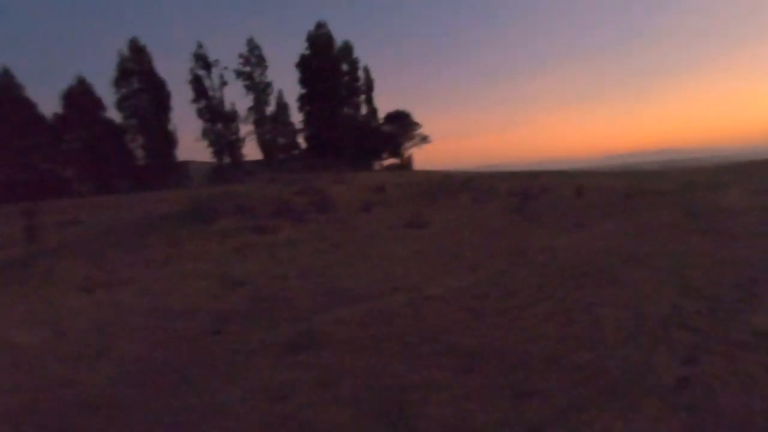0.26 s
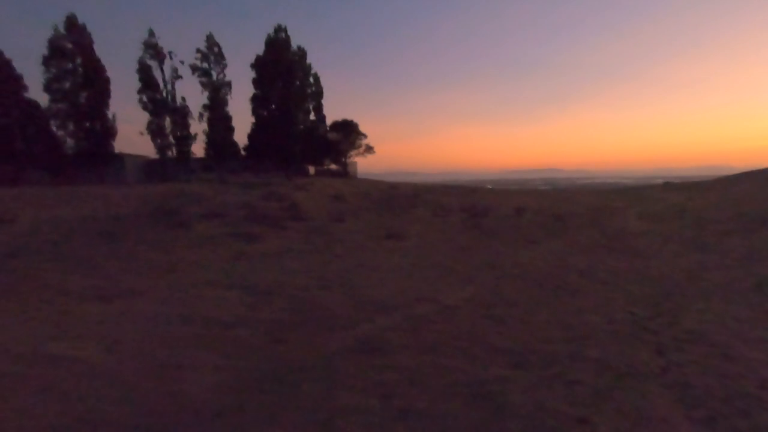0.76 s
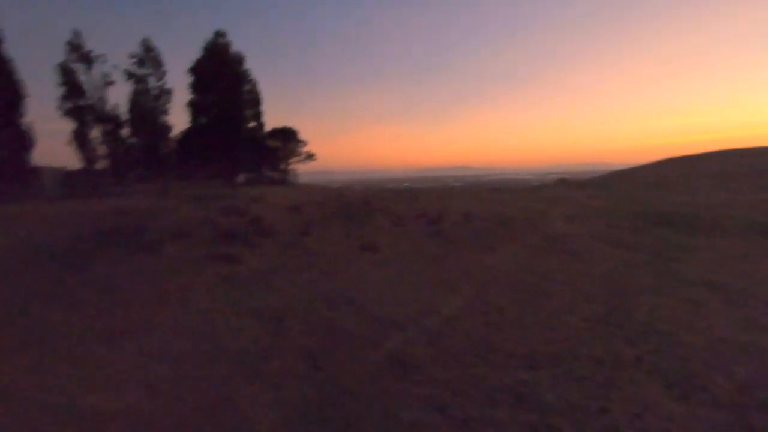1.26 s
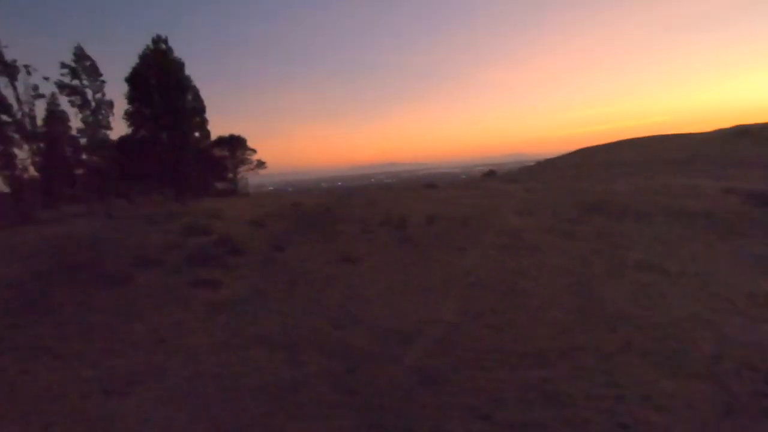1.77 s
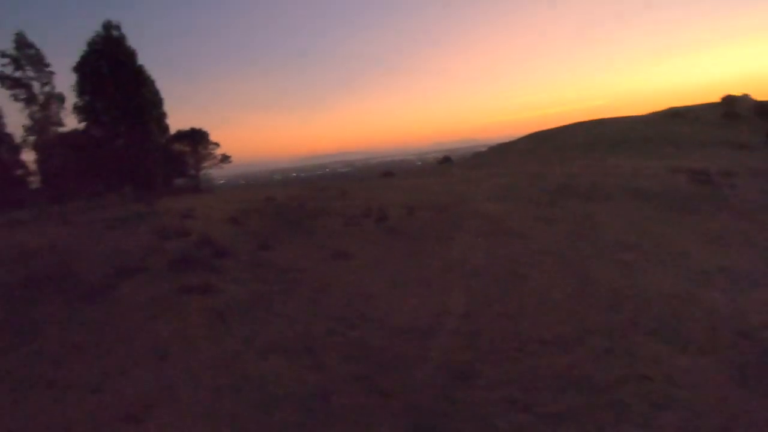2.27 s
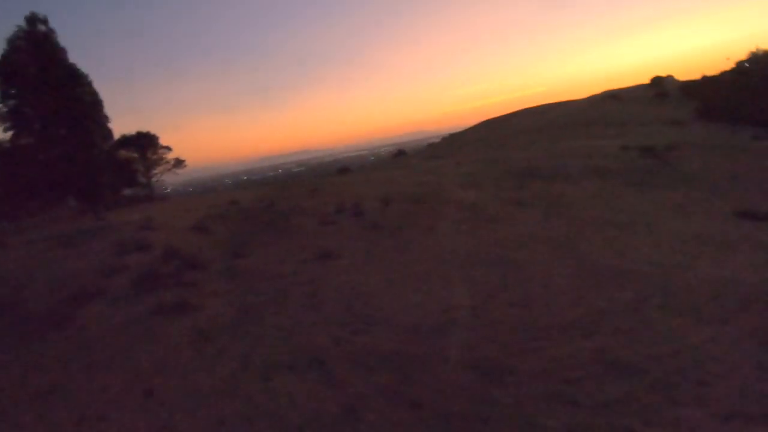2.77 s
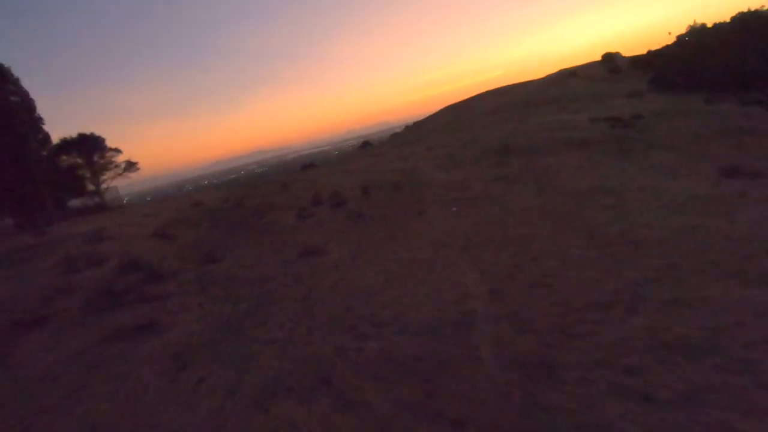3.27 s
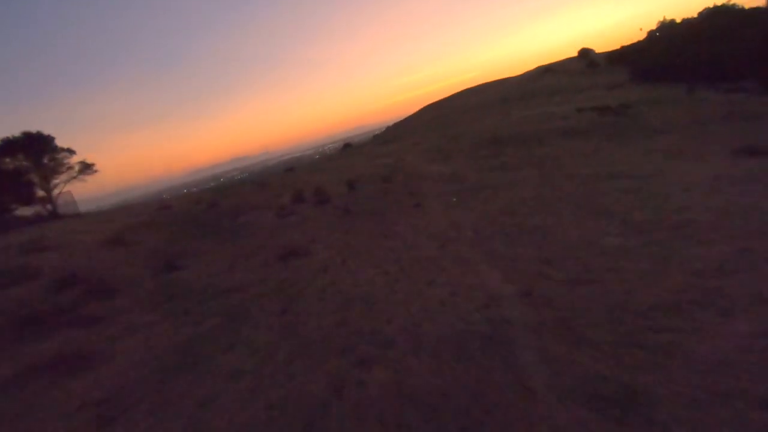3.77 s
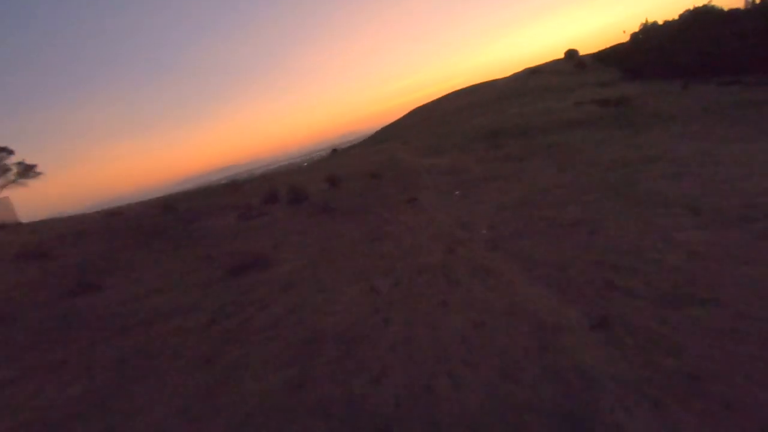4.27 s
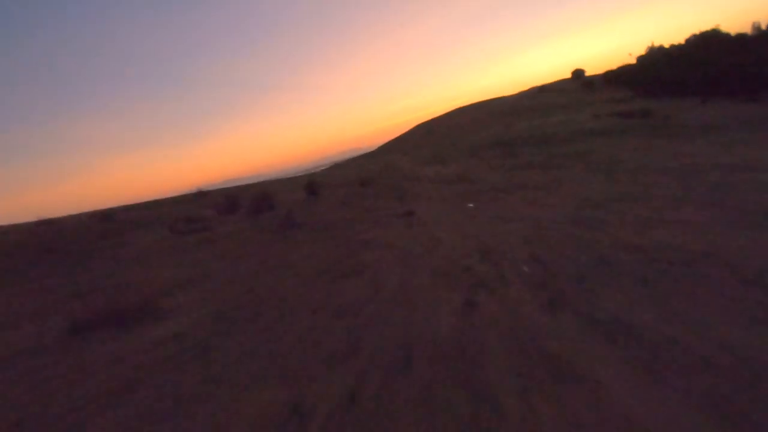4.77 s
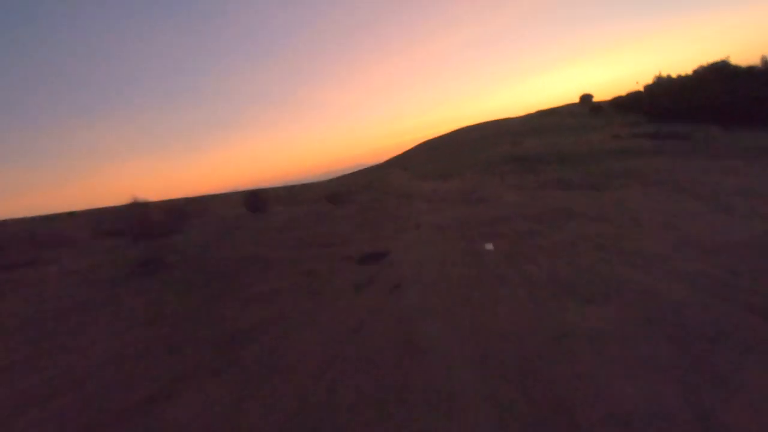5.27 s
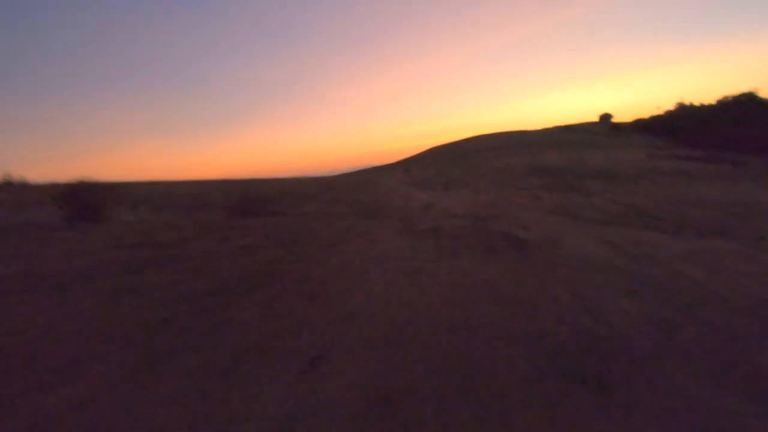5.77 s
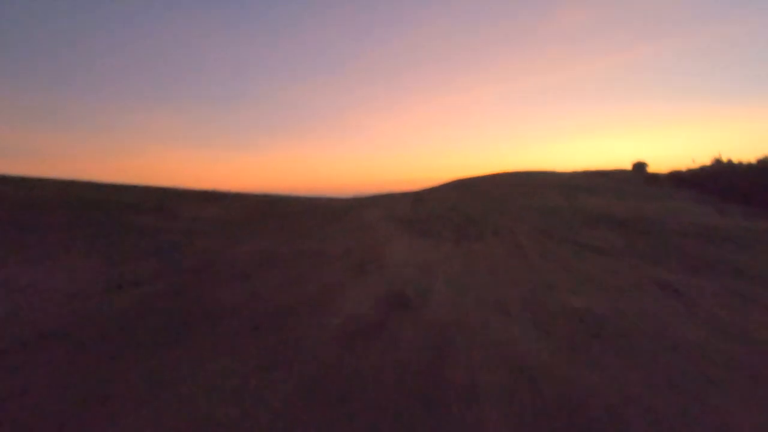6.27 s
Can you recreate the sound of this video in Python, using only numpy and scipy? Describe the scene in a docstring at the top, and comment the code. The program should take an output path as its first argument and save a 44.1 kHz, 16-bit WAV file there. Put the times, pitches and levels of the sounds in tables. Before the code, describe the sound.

Drone propellers buzz with a pulsing hiss in rushing air, dropping in pitch midway and rising again as the wind returns.

```python
"""A throbbing motor drone in rushing air, heard from a camera riding a large drone low over fields.
Two motor speeds shake the frame once a turn and beat against each other; a third joins briefly midway.
Blades hiss in step with the shaking, wind buffets the microphone, and magnets and windings sing faintly.
In about the first half second a side gust dies away, something rustles on the right and something loose
ticks. The shaken microphone rounds off the peaks."""
import sys
import numpy as np
from scipy import signal
from scipy.fft import rfft, irfft, next_fast_len
from scipy.io import wavfile
from scipy.ndimage import uniform_filter1d

SR = 44100
rng = np.random.default_rng(int(sys.argv[2]) if len(sys.argv) > 2 else 0)


def store_pcm(level_fs):
    """Save levels as 16-bit WAV."""
    pcm = np.round(np.clip(level_fs, -1, 1) * 32767).astype(np.int16)
    wavfile.write(sys.argv[1], SR, np.atleast_2d(pcm).T)


N = 287091
TIME = np.arange(N) / SR
SMEAR = .035  # roughness rate of the magnet and winding tones, as a share of their pitch


def undb(db):
    return 10 ** (np.asarray(db) / 20)


def unit(x):
    return x / np.sqrt(np.mean(x ** 2))


def curves(table):
    """Automation: each column after the time as a value per sample, -120 outside the table's span."""
    times, *columns = np.transpose(table)
    return [np.interp(TIME, times, column, -120, -120) for column in columns]


def walk(rate):
    """Smooth random modulation of rms 1, with about `rate` new values a second."""
    steps = np.repeat(rng.standard_normal(int(N * rate / SR) + 2), 8)
    steps = uniform_filter1d(uniform_filter1d(steps, 8), 8)
    return np.interp(TIME * 8 * rate, np.arange(len(steps)), unit(steps))


def spell(start_s, length_s, fade_s):
    """Envelope that fades in up to start_s, holds, then fades out."""
    t = TIME - start_s
    return np.clip(np.minimum(t + fade_s, length_s + fade_s - t) / fade_s, 0, 1) ** 2


def bands(colour, source):
    """EQ a source by (Hz, dB) points and split it into octaves: (log2 centres, bands of summed rms 1)."""
    hz, db = np.transpose(colour)
    size = next_fast_len(N)
    octave = np.log2(np.fft.rfftfreq(size, 1 / SR) + 1)
    spectrum = rfft(source, size) * undb(np.interp(octave, np.log2(hz), db, -120, -120))
    centres = np.arange(np.floor(np.log2(hz[0])), np.log2(hz[-1]) + 1)
    parts = np.array([irfft(spectrum * np.clip(1 - abs(octave - c), 0, 1), size)[:N] for c in centres])
    return centres, parts / np.std(parts.sum(0))


def flickering(colour, rate, depth_db):
    """Coloured noise whose octave bands flicker independently."""
    _, parts = bands(colour, rng.standard_normal(N))
    return unit(sum(band * undb(depth_db * walk(rate)) for band in parts))


def ring(x, modes):
    """Steep resonances (frequency [Hz], width [Hz], gain [dB]), each filter applied twice."""
    out = 0
    for hz, width, db in modes:
        peak = signal.iirpeak(hz, hz / width, SR)
        out = out + undb(db) * signal.lfilter(*peak, signal.lfilter(*peak, x))
    return out


def dull(x, hz):
    return signal.sosfilt(signal.butter(4, hz, fs=SR, output="sos"), x)


def bursts(events, rise_s, decay_s):
    """Short puffs of noise, one per (time [s], level [dB]) row."""
    t = np.arange(SR // 20) / SR
    shape = (1 - np.exp(-t / rise_s)) * np.exp(-t / decay_s)
    out = np.zeros(N)
    for start_s, db in events:
        puff = shape * rng.standard_normal(len(t))
        out[int(start_s * SR):][:len(t)] += undb(db) * puff * np.std(shape) / np.std(puff)
    return out


def phase(hz):
    return 2 * np.pi * np.cumsum(np.maximum(hz, 0)) / SR


def sine(hz, wobble, wobble_hz=13.):
    """A gliding tone of rms 1 whose phase wavers by `wobble` radians."""
    return np.sqrt(2) * np.cos(phase(hz) + wobble * walk(wobble_hz))


def smeared(hz, width_hz):
    """A tone that trembles in level and phase until it is a narrow rough band, rms 1."""
    angle = phase(hz)
    return unit((.6 + walk(width_hz)) * np.cos(angle) + walk(width_hz) * np.sin(angle))


def rasp(depth=.4, rate=110.):
    """Quick, deep random tremolo that roughens a thin tone."""
    return unit(1 - depth + depth * walk(rate))


def motor(shaft, tones):
    """Imbalance shakes the frame once a turn, two blades sound twice a turn, overtones buzz on top."""
    # buzz overtones: (multiple of the shaft rate, level [dB])
    buzz_orders = [(3, -2), (4, -4), (5, -7), (6, -14.5), (7, -13.5)]
    hz, shake_db = curves(shaft)
    buzz = sum(undb(db + 1.1 * walk(15.)) * rasp() * sine(k * hz, wobble=.18 * k, wobble_hz=16.)
               for k, db in buzz_orders)
    shake = undb(shake_db + .8 * walk(25.)) * sine(hz, wobble=.06)
    blade_db, buzz_db = (db + walk(8.8) for db in curves(tones))
    blade_tone = undb(blade_db + 1.8 * walk(25.)) * rasp() * sine(2 * hz, wobble=.8, wobble_hz=21.94)
    return shake, blade_tone + undb(buzz_db) * buzz


def fast_motors():
    """The upper voice of the drone, sagging in pitch and climbing back: (shake, higher tones)."""
    # speed and imbalance: (time [s], shaft rate [Hz], shake [dB])
    shaft = [(0.0, 269, -35), (0.12, 257.7, -28.5), (0.24, 260.8, -21), (0.36, 250.3, -22),
             (0.49, 244.6, -20), (0.61, 230.1, -21.5), (0.73, 231.1, -21.5), (0.85, 234.4, -17),
             (0.97, 233.6, -16.5), (1.09, 236.1, -15.5), (1.2, 232.5, -17.5), (1.32, 207.5, -20.0),
             (1.43, 206.7, -19), (1.54, 198.2, -23.5), (1.65, 193.1, -19.5), (1.76, 192.7, -29.5),
             (1.87, 189.5, -19.5), (1.99, 187.2, -21), (2.08, 189.5, -27), (2.16, 189.2, -29),
             (2.25, 192.4, -32.5), (2.37, 202.4, -28), (2.49, 203.7, -24.5), (2.62, 206.1, -26),
             (2.75, 208.9, -28.5), (2.88, 201.1, -29.5), (3.01, 193.1, -36.5), (3.13, 195.8, -33.5),
             (3.24, 196.6, -32), (3.34, 197.2, -25.5), (3.43, 199, -37), (3.53, 200.9, -19.5),
             (3.63, 204.4, -20.0), (3.73, 206.1, -19.5), (3.84, 211, -19.5), (3.96, 212.3, -21.5),
             (4.07, 214.1, -22.0), (4.19, 233.1, -23), (4.31, 233.1, -24), (4.42, 235.5, -29),
             (4.54, 247.4, -33), (4.61, 249.7, -23.5), (4.68, 246.7, -17.5), (4.75, 246.4, -22.5),
             (4.82, 247.8, -37), (4.92, 241.8, -21.5), (5.01, 248.1, -21), (5.1, 257.4, -30),
             (5.17, 253.9, -18), (5.23, 251.0, -35), (5.34, 251, -24.5), (5.44, 247.5, -20),
             (5.53, 248.7, -38.5), (5.59, 245.4, -28.5), (5.66, 242.8, -40), (5.78, 246.1, -22),
             (5.88, 250.1, -34), (5.99, 245.3, -21), (6.09, 244.7, -24.5), (6.2, 251.7, -25),
             (6.3, 256.8, -31.5), (6.4, 255.9, -33), (6.51, 255.3, -30.5)]
    # rotor tones: (time [s], blade tone [dB], buzz [dB])
    rotor_levels = [(0, -39, -56), (.4, -41, -41), (.75, -48.5, -44.5), (.9, -33, -39.5),
                    (1.1, -44.5, -42.5), (1.3, -33.5, -49.5), (1.6, -39.5, -42.5), (2.0, -36.5, -44.5),
                    (2.2, -57.5, -59), (2.45, -51, -50), (2.7, -58, -55), (2.9, -59, -47.5),
                    (3.05, -46, -50), (3.4, -38.5, -42), (3.7, -44, -57.5), (4.4, -47, -53),
                    (4.6, -38, -66), (5.3, -36.5, -62), (6.51, -41.5, -48)]
    # magnet tones: (time [s], once per pole pair [dB], once per pole [dB], twice per pole [dB])
    pole_levels = [(1.3, -76.5, -71, -96), (1.75, -76, -59, -95), (1.95, -68, -55, -89),
                   (2.15, -68.5, -57, -85), (2.3, -72, -64, -98)]
    shake, tones = motor(shaft, rotor_levels)
    return shake, tones + magnets(shaft, pole_levels)


def slow_motors():
    """The lower voice of the drone, beating against the upper one: (shake, higher tones)."""
    # speed and imbalance: (time [s], shaft rate [Hz], shake [dB])
    shaft = [(0.0, 243.9, -24), (0.1, 217.3, -31), (0.22, 211, -35.5), (0.33, 215, -40),
             (0.41, 214.7, -36.5), (0.53, 216, -41), (0.6, 220, -36.5), (0.67, 222, -39),
             (0.73, 221.3, -38.5), (0.83, 219.1, -36), (0.93, 218.3, -29.5), (1.05, 214.3, -34.0),
             (1.15, 207.3, -22.5), (1.25, 194.2, -26.5), (1.34, 190.5, -18.5), (1.43, 181.8, -27),
             (1.52, 177.4, -21), (1.61, 172.6, -27), (1.72, 176.6, -21.5), (1.82, 173.5, -25),
             (1.92, 176.9, -26), (2.03, 176.7, -22.5), (2.13, 173.1, -28.5), (2.25, 180.3, -19.5),
             (2.38, 184.1, -19.0), (2.51, 183.9, -15.5), (2.6, 186.6, -20), (2.69, 185.3, -41),
             (2.78, 185.2, -21), (2.86, 178.7, -30.5), (2.94, 177.3, -34), (3.06, 172.3, -19.5),
             (3.17, 170.1, -32), (3.25, 174.9, -20), (3.33, 180, -25), (3.41, 180.3, -28.5),
             (3.5, 177, -19.5), (3.58, 174.6, -33), (3.65, 181.8, -20), (3.73, 187.2, -31.5),
             (3.83, 189.1, -22.5), (3.94, 190.4, -28), (4.05, 189.8, -22), (4.11, 196.9, -21),
             (4.18, 206.1, -33), (4.28, 204.7, -17.5), (4.35, 205.1, -22), (4.42, 212.6, -26),
             (4.52, 216.4, -19.5), (4.59, 216.2, -21.5), (4.66, 214.1, -27), (4.79, 212.9, -27.5),
             (4.91, 212.3, -23.5), (5.03, 217.8, -25.5), (5.16, 221.8, -19.5), (5.28, 218.7, -23),
             (5.41, 215.7, -26.5), (5.5, 214.3, -24.5), (5.59, 210.3, -29), (5.67, 210.8, -23.5),
             (5.79, 213.1, -34), (5.87, 210, -31.5), (5.95, 208.7, -33.5), (6.04, 211.1, -29),
             (6.13, 215.5, -27.5), (6.22, 217.1, -26.0), (6.32, 216, -24.5), (6.41, 214.3, -33),
             (6.51, 213.1, -32)]
    # rotor tones: (time [s], blade tone [dB], buzz [dB])
    rotor_levels = [(0, -30.5, -60), (.5, -43.5, -61), (1.1, -48, -57), (1.6, -33, -55), (1.9, -39, -52),
                    (2.15, -39.5, -49), (2.38, -40.5, -44), (2.55, -44.5, -55.5), (2.65, -44, -50),
                    (2.8, -40, -50.5), (3.0, -40.5, -46.5), (3.5, -37.5, -47.5), (4.1, -38, -46),
                    (4.3, -37, -44.5), (4.6, -37, -42.5), (4.9, -35.5, -45.5), (5.25, -36.5, -51.5),
                    (5.6, -35, -56.5), (6.0, -42, -43.5), (6.51, -31, -62.5)]
    # magnet tones: (time [s], once per pole pair [dB], once per pole [dB], twice per pole [dB])
    pole_levels = [(1.9, -70, -74, -80), (2.14, -52, -51, -72), (2.5, -60, -58.5, -73),
                   (2.8, -52.5, -63, -78), (2.92, -58, -55, -77), (3.1, -62, -62, -77.5),
                   (3.5, -64, -60, -80), (3.75, -64, -54, -85), (4.0, -61, -51, -82), (4.22, -63, -49, -84),
                   (4.4, -78, -68, -90)]
    shake, tones = motor(shaft, rotor_levels)
    return shake, tones + magnets(shaft, pole_levels)


def wind(gust_hz=14.):
    """Turbulence on the microphone port: deep gusty buffeting, a rumble and a brighter roar."""
    # wind strength, before each layer's trim: (time [s], rumble [dB], roar [dB], buffeting [dB])
    strength = [(0, -25, -31, -43), (.2, -27.5, -32.5, -35), (.42, -28.5, -33.5, -35),
                (.52, -30.5, -32, -39), (.62, -27.5, -28, -43.5), (.7, -29, -33, -41),
                (.8, -28.5, -37.5, -47), (.98, -37, -41, -48), (1.35, -48, -39, -49),
                (1.7, -48, -37.5, -52.5), (2.1, -41.5, -38.5, -52), (2.25, -41, -43.5, -57.5),
                (2.6, -41.5, -42, -64), (3.0, -40, -49, -53.5), (3.45, -40, -43, -38),
                (3.9, -37.5, -37.5, -40), (4.25, -32, -35.5, -51), (4.45, -28.5, -39.5, -42),
                (4.85, -27.5, -35, -42), (5.1, -27, -34, -44), (5.3, -27.5, -32.5, -49),
                (5.62, -25.5, -31, -50), (5.75, -29, -30, -38), (5.92, -25, -28, -33),
                (6.05, -30, -28, -38), (6.15, -26.5, -32.5, -42), (6.51, -26, -30, -53)]
    # rumble spectrum: (frequency [Hz], relative level [dB])
    rumble_colour = [(25, -22.5), (50, -4.5), (80, -1), (130, -6), (175, -3), (230, -0.5), (310, -8),
                     (420, -14.5), (600, -25)]
    # roar spectrum: (frequency [Hz], relative level [dB])
    roar_colour = [(120, 0.5), (300, -1.5), (500, -4), (800, -8), (1200, -13), (2000, -22.5), (3000, -24)]
    buffet_colour = [(18, -6), (30, -9), (50, -4), (70, -11)]
    rumble_db, roar_db, buffet_db = curves(strength)
    buffet = undb(buffet_db + 4.5 * walk(gust_hz)) * flickering(buffet_colour, rate=20., depth_db=1.2)
    rumble = undb(rumble_db + .03 * walk(gust_hz)) * flickering(rumble_colour, rate=9.1, depth_db=.97)
    roar = undb(roar_db + .7 * walk(gust_hz)) * flickering(roar_colour, rate=25., depth_db=1.2)
    return buffet + undb(4.5) * rumble + undb(2.5) * roar


def blade_hiss(shake, pulse_db=2.):
    """Broad hiss from the blades; it swells at each crest of the shake, so it throbs with the beat."""
    # hiss automation: (time [s], level [dB], tilt [dB/octave], edge near 4 kHz [dB])
    automation = [(0, -46.5, 5.5, 2.5), (.22, -38.5, -2, 0.5), (.36, -41.5, 1, 1.5), (.49, -39, 1.5, -2),
                  (.54, -37.5, -2.5, -1.5), (.64, -38, 0, 0), (.72, -41.5, 2, 1.5), (.8, -39, 1, -1),
                  (1.4, -42.5, -1, 7), (2.05, -41.5, -0.3, 0.5), (2.15, -45, 2, -3), (2.52, -47.5, 1, -3),
                  (3.3, -43, 0, -2.5), (4.08, -40, -1.5, 2), (4.2, -38, -1, 4), (4.3, -40.5, -1.5, -3),
                  (4.44, -40, -1, 1.5), (4.48, -41.5, -1, 2), (4.62, -40, -0.5, 2), (4.7, -43, 0.5, -1),
                  (4.8, -39, -0.5, -1), (5.0, -45, 2.5, 0), (5.4, -43.5, 2, -1.5), (5.68, -41, 0, -4),
                  (5.77, -38.5, -1, -3), (5.93, -38.5, -1.5, -4), (6.06, -37.5, -1.5, -5),
                  (6.22, -39.5, 0, -1), (6.51, -39, -1, -1)]
    # hiss spectrum: (frequency [Hz], relative level [dB])
    colour = [(700, -21.5), (1200, -3.5), (1500, -4), (2000, -4.5), (2800, -7.5), (3500, -11),
              (4200, -17.5), (5000, -23.5), (6000, -27), (7000, -34.5), (8500, -38.5), (9000, -44),
              (10000, -49), (12000, -66)]
    # frame resonances in the rush of air: (frequency [Hz], width [Hz], level against the hiss [dB])
    frame_modes = [(6030, 280, -42.5), (7450, 250, -46.5), (8470, 200, -54.5)]
    hiss_db, tilt_db, edge_db = curves(automation)
    edge_octave = np.log2(4096)
    hiss = 0
    for octave, band in zip(*bands(colour, rng.standard_normal(N))):
        eq_db = tilt_db * (octave - edge_octave + .5) + edge_db * (octave == edge_octave)
        hiss = hiss + band * undb(eq_db + .7 * walk(22.))
    crest = shake / np.sqrt(uniform_filter1d(shake ** 2, size=SR // 5))
    throb = unit(undb(pulse_db * crest + 1.1 * walk(150.)))
    rings = sum(undb(db + 2.8 * walk(5.7)) * unit(ring(rng.standard_normal(N), [(hz, width, 0)]))
                for hz, width, db in frame_modes)
    return undb(hiss_db - 1) * (hiss * throb + rings)


def side_gust(length_s=.556, fade_db_per_s=36):
    """A gust from one side hits the ports with a low thud and a dying swish."""
    thud = flickering([(25, -7), (60, -6), (120, -3), (200, -25)], rate=7.6, depth_db=3.)
    swish_colour = [(700, -5), (1100, -1.5), (1600, -5), (2400, -19), (4500, -23.5)]
    swish = flickering(swish_colour, rate=21.6, depth_db=2.5)
    swish_db = -45.5 - fade_db_per_s * TIME
    return spell(0, length_s, fade_s=.03) * (undb(-47) * thud + undb(swish_db) * swish)


def rustle():
    """Grainy treble scrapes with single crackles, close to the microphone."""
    # scrapes: (start [s], length [s], relative level [dB])
    scrapes = [(0, 0.1, -67.5), (0.132, 0.14, -64.5), (0.329, 0.043, -61.5), (0.417, 0.055, -61.5),
               (0.503, 0.05, -65), (.58, 0.07, -78)]
    # crackles: (time [s], level [dB])
    crackles = [(.134, -54), (.179, -42), (.224, -48.5), (.361, -46.5), (.44, -56.5), (.457, -52),
                (.468, -47.5), (.534, -46.5), (.557, -46.5)]
    # rustle spectrum: (frequency [Hz], relative level [dB])
    colour = [(4000, -11), (5500, -1), (8000, -3.5), (9500, -11), (12500, -11), (13600, -20.5)]
    envelope = sum(undb(db) * spell(start_s, length_s, fade_s=.036) for start_s, length_s, db in scrapes)
    grains = envelope * undb(9 + 2 * walk(250.)) * rng.standard_normal(N)
    grains += bursts(crackles, rise_s=.0005, decay_s=.002)
    _, parts = bands(colour, grains)
    return np.std(grains) * parts.sum(0)


def ticks():
    """Short noisy taps ring a small loose part."""
    # taps: (time [s], strike level [dB])
    taps = [(.1355, -36), (.1382, -27), (.1426, -33), (.1612, -27), (.1658, -33), (.1992, -25), (.208, -36),
            (.218, -30), (.2223, -28), (.2605, -32), (.569, -36), (.6425, -31.5)]
    # resonances of the part: (frequency [Hz], width [Hz], gain [dB])
    modes = [(2670, 1500, 11), (3600, 1500, 8), (4860, 1200, -11), (7100, 1700, -18)]
    return dull(ring(bursts(taps, rise_s=.0003, decay_s=.0013), modes), hz=7500)


def flutters(relative_width=.46):
    """Brief raspy puffs of air off the blades, each in its own broad band."""
    # puffs: (peak time [s], half-length [s], level [dB], band centre [Hz])
    puffs = [(0.579, 0.0079, -33, 2008), (0.644, 0.0058, -36.5, 2300), (2.644, 0.022, -37.5, 950),
             (2.87, .02, -42, 951), (4.155, 0.0046, -52.5, 4483), (4.323, 0.0069, -37.5, 1888),
             (4.385, 0.0097, -37, 2005), (4.409, 0.0086, -37, 2400), (4.449, 0.012, -34, 2005),
             (4.512, 0.0043, -39, 2000), (4.551, 0.0066, -33, 1910), (4.651, 0.0063, -37.5, 2526),
             (5.256, 0.0051, -44.5, 3505), (5.285, 0.0054, -42.5, 3192), (5.344, 0.0061, -42, 2193),
             (5.629, 0.0065, -32.5, 1400), (5.788, 0.0046, -42, 3000)]
    out = np.zeros(N)
    t = np.arange(SR // 10) / SR - .05
    for peak_s, half_s, db, hz in puffs:
        shape = np.exp(-(t / half_s) ** 2)
        puff = shape * ring(rng.standard_normal(len(t)), [(hz, relative_width * hz, 0)])
        out[int((peak_s + t[0]) * SR):][:len(t)] += undb(db) * puff * np.std(shape) / np.std(puff)
    return dull(out, hz=5000)


def whine():
    """Faint, fluttering whistles, mostly from the motor windings; one lower whistle near 1.2 kHz is a buzz
    overtone of a motor's shaft rate."""
    # whistles: (start [s], length [s], pitch [Hz], drift [Hz/s], level [dB])
    whistles = [(2.297, 0.11, 2800, -0.5, -54), (2.679, 0.17, 2648, 97.5, -57.5),
                (2.879, 0.11, 2788, -1.5, -57.5), (3.253, 0.3, 2780, 0, -49.5),
                (3.56, 0.16, 2854, 200, -51), (4.38, 0.05, 2875, -1, -50), (4.529, .14, 2790, 299, -49),
                (4.566, 0.1, 1226, 0, -57), (4.74, 0.32, 2835, 1, -49), (2.101, 0.38, 5920, 1.5, -75),
                (3.2, 0.37, 5925, -4.5, -75), (4.46, 0.59, 6030, 56, -79.5), (4.601, 0.16, 6250, -2, -81),
                (0.702, .12, 7550, -0.5, -85), (4.1, .36, 7402, 844, -82), (5.78, .15, 7450, -1, -76),
                (1.75, 0.24, 8507, -200, -87), (2.87, .18, 8520, -5, -87), (3.999, .1, 8475, 0, -76),
                (5.08, .15, 8470, -7, -76), (6.201, 0.3, 8480, 3, -84)]
    out = np.zeros(N)
    for start_s, length_s, hz, drift, db in whistles:
        glide = hz + drift * (TIME - start_s)
        out += undb(db) * spell(start_s, length_s, fade_s=.082) * smeared(glide, SMEAR * hz)
    return out


def magnets(shaft, pole_levels, pole_pairs=7):
    """Magnets passing the windings sing rough tones at multiples of the shaft rate."""
    hz = pole_pairs * curves(shaft)[0]
    return sum(undb(db) * smeared(k * hz, SMEAR * k * hz.mean())
               for k, db in zip((1, 2, 4), curves(pole_levels)))


def middle_motor():
    """A wavering shake at a speed between the other two makes the beat irregular."""
    # speed and imbalance: (time [s], shaft rate [Hz], shake [dB])
    shaft = [(2.4, 191.5, -93), (2.6, 192.7, -43.5), (2.8, 191.2, -29.5), (2.92, 188.5, -40),
             (3.03, 187.6, -32), (3.15, 185.6, -32), (3.35, 189, -27.5), (3.55, 190.2, -34.5),
             (3.7, 192, -44.5), (3.85, 191.4, -90)]
    hz, shake_db = curves(shaft)
    return undb(shake_db + 4.4 * walk(12.)) * sine(hz, wobble=.36)


def scene():
    """Drone and wind in the centre, the gust pushing the two ports opposite ways, the rustle right."""
    fast_shake, fast_tones = fast_motors()
    slow_shake, slow_tones = slow_motors()
    shake = fast_shake + slow_shake + middle_motor()
    air = wind() + blade_hiss(shake) + flutters()
    centre = shake + fast_tones + slow_tones + air + ticks() + whine()
    antiphase, right = np.array([[1], [-1]]), np.array([[.12], [1]])
    return centre + antiphase * side_gust() + right * rustle()


def record(dry, drive=1.5, lopsided=.15, bottom_hz=18., top_hz=13700):
    """The shaken microphone bends unevenly and rounds peaks, adding sum and side tones of the motors."""
    bent = np.tanh(drive * (dry + lopsided * dry ** 2)) / drive
    bent = signal.sosfilt(signal.butter(2, bottom_hz, "high", fs=SR, output="sos"), bent)
    return signal.sosfilt(signal.ellip(8, .2, 70, top_hz, fs=SR, output="sos"), bent)


dry = scene()
out = record(dry)
store_pcm(out)
```